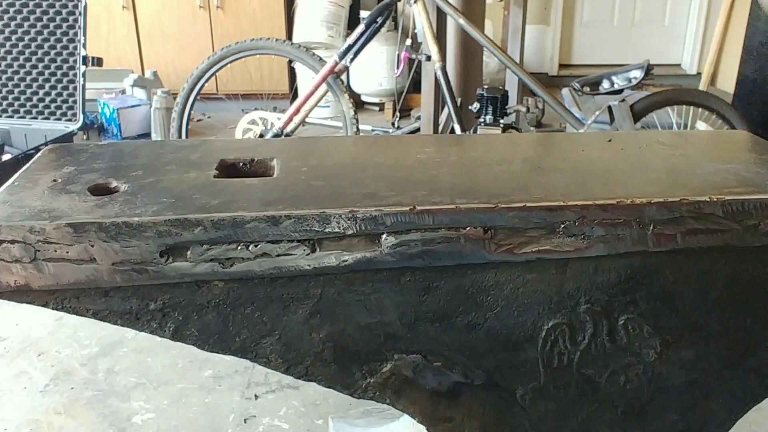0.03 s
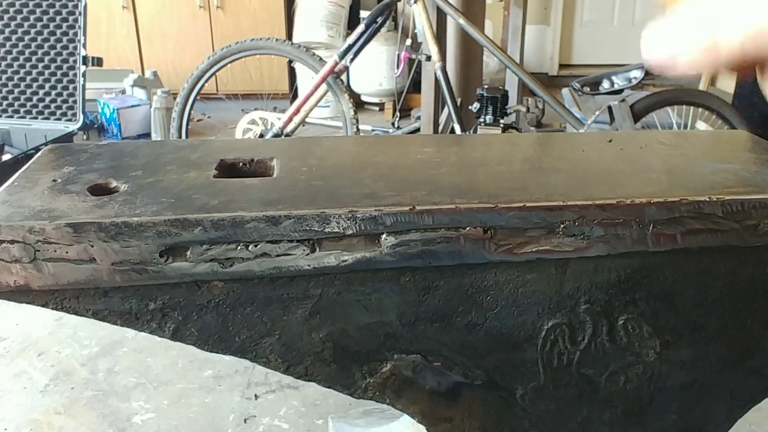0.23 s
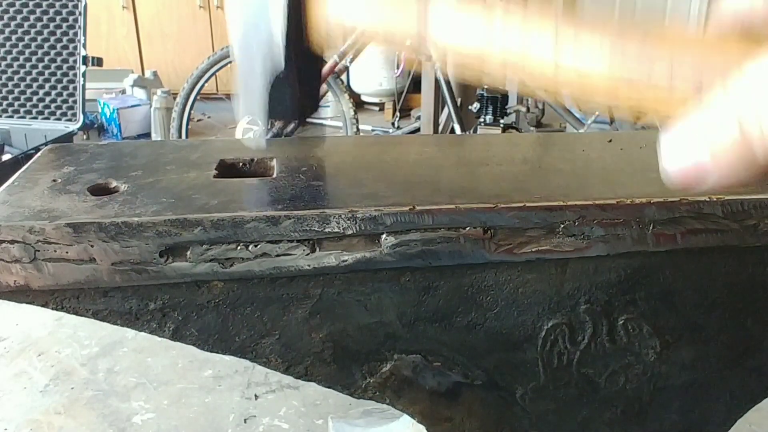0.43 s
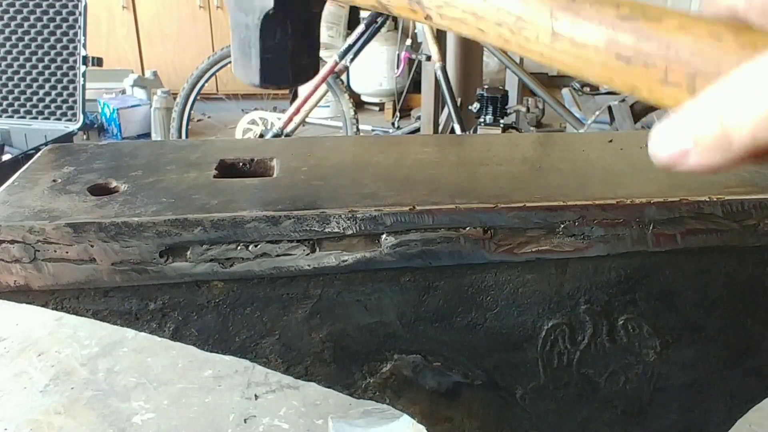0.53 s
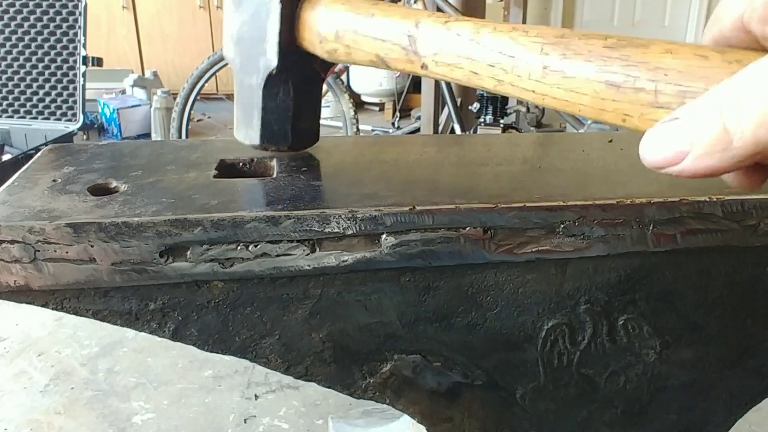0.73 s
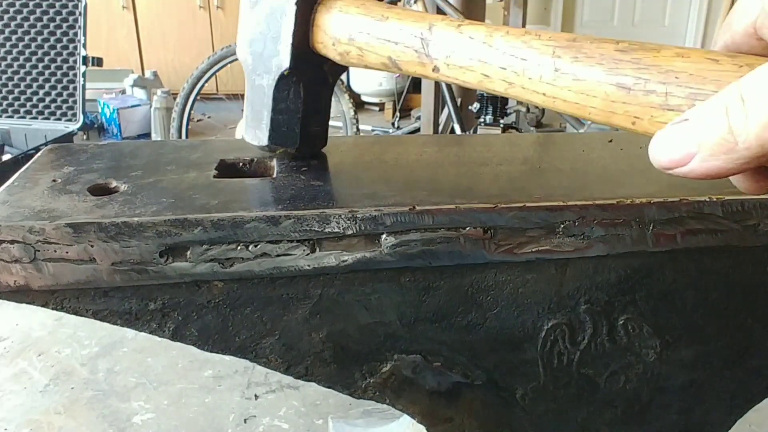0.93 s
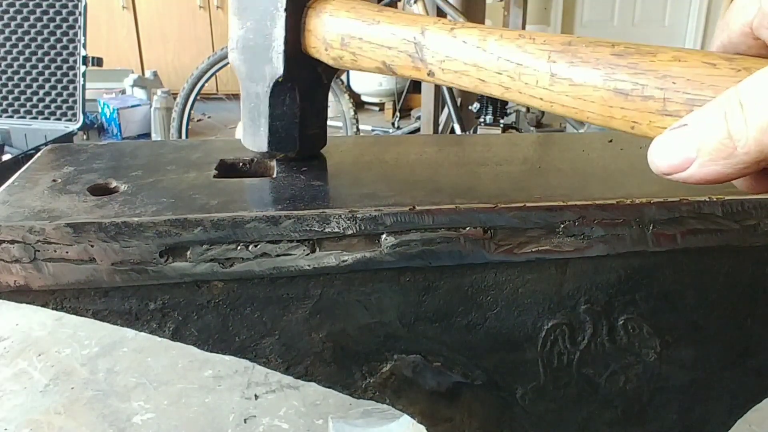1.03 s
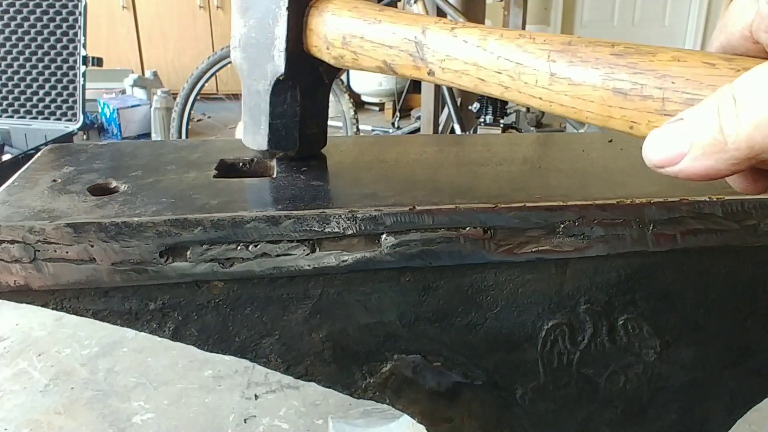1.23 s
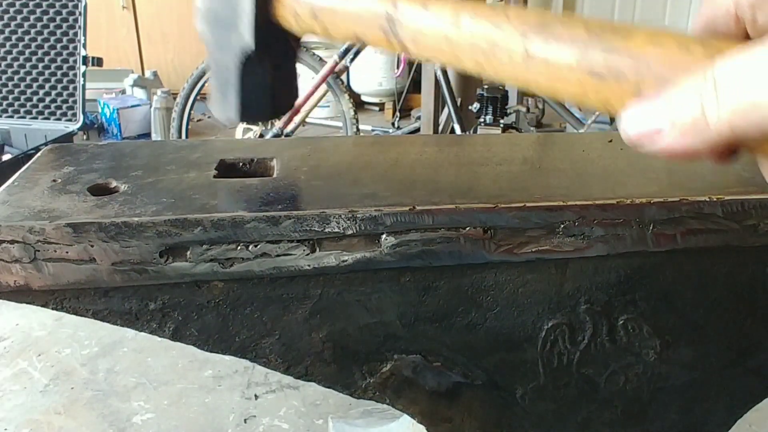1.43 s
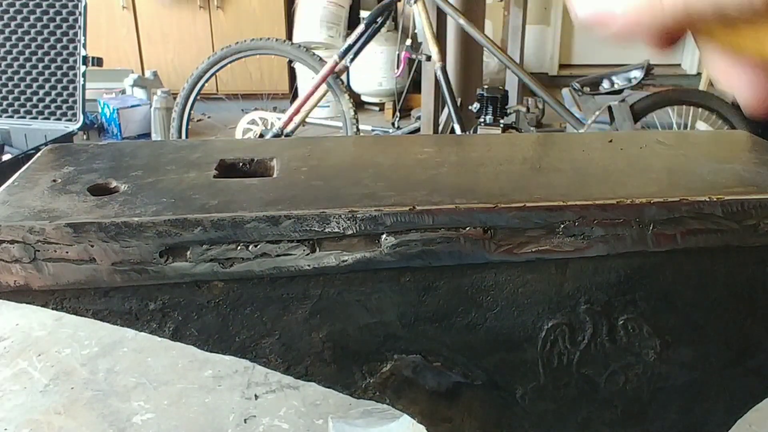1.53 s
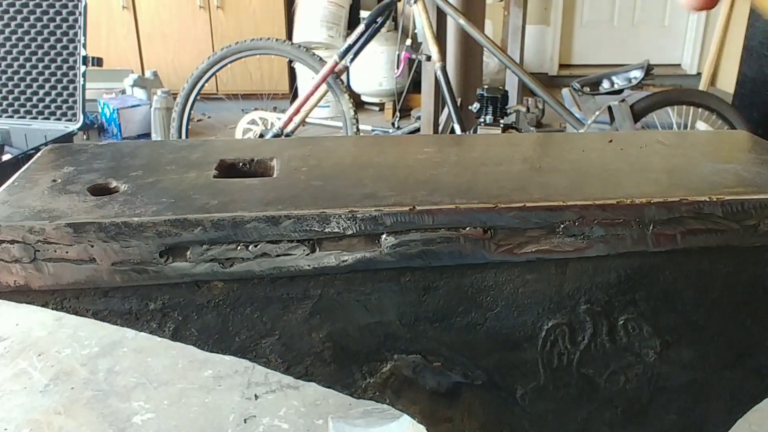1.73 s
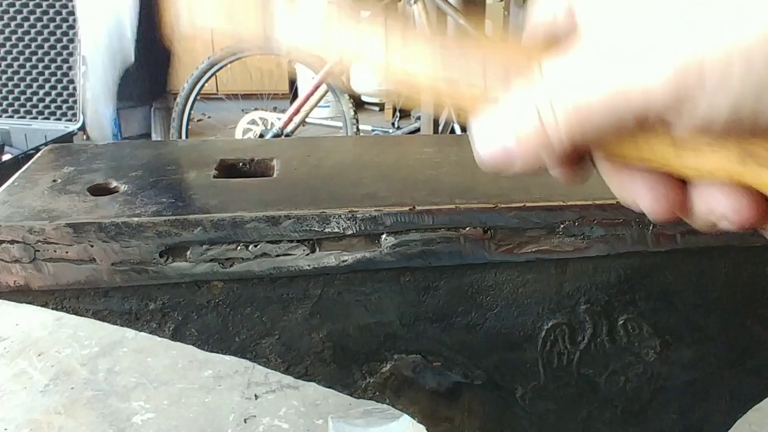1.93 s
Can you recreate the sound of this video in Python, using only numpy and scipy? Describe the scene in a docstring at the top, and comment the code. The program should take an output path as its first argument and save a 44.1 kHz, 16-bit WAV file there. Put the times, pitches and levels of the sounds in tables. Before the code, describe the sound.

A hammer strikes a steel anvil close by at 0.2 seconds with a loud, sharp clank and a short bright ring. It bounces at 0.5, 0.7 and 0.8 seconds, then ever faster and softer, ending in a tiny rattle at 1 second. The ring and short garage echo die away soon after. A faint low hum remains, with a barely audible bump near 1.4 seconds and a tick near 2.

```python
"""A hammer falls on a steel anvil and bounces, ever faster and softer, until it lies still.
Each blow is a short clank that tops up the anvil's one strong note; the hard first blows also
set the hammer head singing. The garage answers with a short echo over a low hum, and faint
handling sounds follow. A limiter (an automatic volume control) holds down the loudest blows."""
import sys
import numpy as np
from scipy import signal
from scipy.fft import rfft, irfft
from scipy.io import wavfile
from scipy.ndimage import uniform_filter1d, minimum_filter1d

SR = 44100
rng = np.random.default_rng(int(sys.argv[2]) if len(sys.argv) > 2 else 0)


def dump_mix(stems):
    """Bounce the given channels to the path in sys.argv[1] as a 16-bit WAV at rate SR."""
    frames = np.atleast_2d(stems).T  # one column per channel
    limited = np.clip(frames, -1, 1)  # hard clip at full scale
    pcm = np.round(limited * 32767).astype(np.int16)
    wavfile.write(sys.argv[1], SR, pcm)


N = 88200
TIME = np.arange(N) / SR
FREQS = np.maximum(np.arange(N // 2 + 1) * SR / N, 1)
SIDES = np.array([[.5], [-.5]])  # shares a left-right difference between the two sides


# Each time the hammer lands: (time [s], strength [dB], bass gain [dB], treble gain [dB],
# dull above [Hz], push to the main note [dB], hollow knock [dB])
BLOWS = [(0.2077, 18, -1.5, -5, 11100, 6, -9), (.5226, 3.5, -5.5, -4.5, 8000, -4, -21),
         (.7021, -2.5, -6.5, -8, 6250, -8, -23.5), (.7972, -2, -10.5, -3, 3010, -5, -18),
         (.8471, -4, -5, -9, 3130, -9, -20.5), (.8832, -5, -4, -4.5, 2500, -11, -21.5),
         (.9092, -11, -8.5, -17, 2440, -13, -28.5), (.9295, -12.5, -12, -15, 2400, -26, -26),
         (.9452, -25.5, -7.5, -24.5, 2700, -50, -30), (.9578, -19.5, 4.5, -5, 2700, -22, -31),
         (.9675, -27, 13, -29, 2700, -19.5, -33), (.9755, -25, 5.5, -4.5, 2700, -18, -31.5)]

def hammer():
    """One short push per blow; slower blows stay in contact longer and sound duller."""
    force = np.zeros(N)
    click = signal.unit_impulse(1024)
    for time, db, bass_db, treble_db, dull_above_hz, *_ in BLOWS:
        pulse = tone_control(click, hz=594, low_db=bass_db)
        pulse = tone_control(pulse, hz=3080, high_db=treble_db)
        start = int(time * SR)
        force[start:start + len(click)] += from_db(db) * keep_band(pulse, dull_above_hz, "low")
    return force


# The crack of contact, many brief tones packed together: (frequency [Hz], relative level [dB])
CRACK_COLOUR = [(60, -61), (200, -39.5), (380, -34), (500, -40), (650, -32), (880, -42), (1100, -31.5),
                (1700, -33.5), (2300, -28.5), (3200, -34), (4200, -26), (5300, -26.5), (6300, -49.5),
                (7500, -38.5), (10500, -36), (13000, -52.5), (16000, -56)]
# Which side the crack leans to: (frequency [Hz], left minus right [dB])
CRACK_PAN = [(200, -5), (2400, -12.5), (4400, 4.5), (8000, 1.5), (15000, 8.5)]
# The tones of anvil and hammer besides the main note:
# (pitch [Hz], relative level [dB], fade time [s], left minus right [dB], left ahead by [rad])
STEEL_TONES = [(1067, -29, .035, -8, -3.5), (1274, -29, 0.078, 4, 6.5), (1333, -18, 0.11, 2.5, -2.5),
               (1978, -9, 0.027, 6, 1.85), (2070, -44, 0.31, 1.5, 3.9), (2236, -8, 0.052, -8.5, 3.3),
               (2303, -26.5, 0.2, -1.5, 3.5), (2656, -31, 0.37, -2.5, -2), (2859, -9.5, 0.035, -13.5, 2.5),
               (2915, -32.5, 0.57, 3.5, -0.5), (3380, -40, 0.41, 3.5, -7.5), (3660, -15, 0.016, -11, -2.8),
               (4990, -27.5, .28, 7.5, 2.5), (11354, -30, 0.38, 16, -2)]

def steel_clank():
    """What one blow sets ringing: a sharp crack and separate tones, which give off little bass."""
    crack = noise(CRACK_COLOUR, CRACK_PAN) * from_db(31.5) * fade(0.023) * rise(0.00031)
    tones = 0
    for hz, db, fade_s, pan_db, lead in STEEL_TONES:
        wave = np.sin(2 * np.pi * hz * TIME + SIDES * lead)
        tones += from_db(db + SIDES * pan_db) * fade(fade_s) * wave
    return crack + keep_band(tones * rise(0.00038), hz=200, kind="high")


NOTE_HZ, NOTE_SAG_HZ, NOTE_SETTLE_S = 1504.2, 26.77, .36
NOTE_FADE_S, NOTE_LINGER_S, NOTE_LINGER_DB = 0.15, 0.59, -15
NOTE_DB, NOTE_PAN_DB, NOTE_LEAD_RAD = -3, 9, 2.87
NOTE_WAVER_HZ, NOTE_WAVER_DB = 10, 0.5

def anvil_note():
    """Each blow adds energy to the anvil's main note, which dies quickly at first, then lingers."""
    energy = 0
    for time, *_, push_db, _ in BLOWS:
        ring = fade(NOTE_FADE_S, time) + from_db(NOTE_LINGER_DB) * fade(NOTE_LINGER_S, time)
        energy += (from_db(push_db) * ring) ** 2
    loudness = keep_band(np.sqrt(energy), hz=390, kind="low")  # rounds off each jump
    since_first_blow = TIME - BLOWS[0][0]
    waver = from_db(NOTE_WAVER_DB * np.cos(2 * np.pi * NOTE_WAVER_HZ * since_first_blow))
    # The pitch sits a little low after the first, hardest blow, then settles.
    hz = NOTE_HZ - NOTE_SAG_HZ * np.exp(-np.maximum(since_first_blow, 0) / NOTE_SETTLE_S)
    wave = np.sin(2 * np.pi * np.cumsum(hz) / SR + SIDES * NOTE_LEAD_RAD)
    return loudness * waver * from_db(NOTE_DB + SIDES * NOTE_PAN_DB) * wave


# The two tones of the hollow knock: (pitch [Hz], relative level [dB], fade time [s])
KNOCK_TONES = [(692, -17.5, 0.15), (757.6, -2.5, 0.057)]

def knocks():
    """Every blow gives a hollow knock, which stands out in the soft last bounces."""
    taps = np.zeros(N)
    for time, *_, knock_db in BLOWS:
        taps[int(time * SR)] = from_db(knock_db)
    knock = sum(from_db(db) * fade(fade_s) * np.sin(2 * np.pi * hz * TIME)
                for hz, db, fade_s in KNOCK_TONES)
    return play_through(taps, knock[None])


# How strong the echo is, from bass to treble: (frequency [Hz], relative level [dB])
ECHO_COLOUR = [(40, -7), (85, 22), (150, 13), (300, 17.5), (500, 8), (750, 12.5), (880, 3.5), (1150, 9),
               (1400, 16.5), (1495, 29.5), (1590, 9.5), (1700, 6.5), (2250, 25.5), (2550, 17), (2850, 20.5),
               (3300, 17), (4000, 10.5), (5200, 12), (6300, -0.5), (7700, 10.5), (10500, 6.5),
               (13000, -10.5), (16000, -22.5)]
# How long the echo lasts: (frequency [Hz], fade time [s])
ECHO_FADES = [(100, 0.77), (260, 0.37), (700, .5), (2000, 0.49), (4800, 0.47), (8000, 0.28), (12000, 0.15)]
# Which side the echo leans to: (frequency [Hz], left minus right [dB])
ECHO_PAN = [(100, 3), (700, -1.5), (2400, -1), (5000, 13), (11000, 5)]

def garage_echo():
    """The room's blurred answer to one blow: it builds quickly, and each band fades at its own pace."""
    spectrum = rfft(noise(ECHO_COLOUR, ECHO_PAN))
    echo = 0
    for band_hz, fade_s in ECHO_FADES:
        band = at_hz([(hz, hz == band_hz) for hz, _ in ECHO_FADES], FREQS)
        loudness = fade(fade_s) * rise(.005) ** 2
        echo += irfft(spectrum * band, N) * loudness / np.linalg.norm(loudness)
    return echo


# Small puffs of noise: (time [s], pitch [Hz], pitch spread [Hz], half length [s], level [dB])
HANDLING_SOUNDS = [(1.398, 54.6, 40, 0.07, -50.5), (1.595, 4060, 120, .014, -68.5),
                   (1.956, 2580, 1295, 0.005, -58)]

def handling():
    """A soft low bump, a tiny squeak and a light tick as the hammer is taken away."""
    sounds = 0
    for time, hz, spread_hz, half_length, db in HANDLING_SOUNDS:
        band = np.exp(-(2 * (FREQS - hz) / spread_hz) ** 2)
        rustle = unit_level(irfft(rfft(rng.standard_normal((2, N))) * band, N))
        swell = np.exp(-((TIME - time) / half_length) ** 2)
        sounds += from_db(db) * swell * rustle
    return sounds


# The room's steady rumble: (frequency [Hz], relative level [dB])
RUMBLE_COLOUR = [(25, -17), (55, -4.5), (85, -4.5), (125, -5.5), (160, -9), (250, -15), (400, -21.5),
                 (600, -26), (800, -26), (1000, -32), (2000, -33.5), (3000, -38.5), (5200, -44),
                 (6200, -52.5), (7800, -49), (11000, -53.5), (13000, -70.5)]
# The motor's hum: (pitch [Hz], level [dB])
HUM_TONES = [(59.4, -69), (119, -56)]
# The opening hiss: (frequency [Hz], relative level [dB])
HISS_COLOUR = [(150, 1.5), (400, 7), (900, -2), (2500, -4), (5200, -4.5), (6200, -23), (10000, -18),
               (13000, -35)]

def background():
    """Low rumble, a motor's hum and a faint hiss that drops away at the first blow."""
    hum = sum(from_db(db) * np.sqrt(2) * np.sin(2 * np.pi * (hz * TIME + rng.random()))
              for hz, db in HUM_TONES)
    since_first_blow = np.maximum(TIME - BLOWS[0][0], 0)
    hiss = from_db(-58) * unit_level(noise(HISS_COLOUR)) * np.exp(-since_first_blow / 0.12)
    rumble = from_db(-54.5) * unit_level(noise(RUMBLE_COLOUR))
    lean_right = from_db(SIDES * -1)
    return (rumble + hum) * lean_right + hiss


# How alike the two sides of a noise are: (frequency [Hz], likeness [0 to 1])
LIKENESS = [(60, 0.25), (290, 0.93), (640, 0), (1400, 0.28), (3100, 0.057), (7000, 0)]

def noise(colour, pan=((1000, 0),)):
    """Stereo noise with the given colour (level at each frequency), most alike in the bass."""
    shared, opposed = rfft(rng.standard_normal((2, N)))
    alike = at_hz(LIKENESS, FREQS)
    both = (np.sqrt(1 + alike) * shared + np.sqrt(1 - alike) * opposed * 2 * SIDES) / np.sqrt(2)
    return irfft(both * from_db(at_hz(colour, FREQS) + SIDES * at_hz(pan, FREQS)), N)


def from_db(db):
    """Turn decibels into a number to multiply by."""
    return 10 ** (np.asarray(db) / 20)


def at_hz(points, hz):
    """Read between a table's rows, giving every octave equal room."""
    frequencies, values = np.array(points).T
    return np.interp(np.log(hz), np.log(frequencies), values)


def unit_level(x):
    """Scale a sound to an average (RMS) level of 1."""
    return x / np.sqrt(np.mean(x ** 2) + 1e-20)


def fade(seconds, start=0):
    """Jump to 1 at the start, then fall 60 dB in the given fade time."""
    return (TIME >= start) * np.exp(-np.log(1000) * np.maximum(TIME - start, 0) / seconds)


def rise(seconds):
    """Climb from 0 towards 1, about two thirds of the way in the given time."""
    return 1 - np.exp(-TIME / seconds)


def play_through(pushes, response):
    """Let every push set off its own copy of the response."""
    return signal.fftconvolve(pushes[None], response, axes=1)[:, :N]


def keep_band(x, hz, kind):
    """Gently filter a sound, keeping its "low" or its "high" part."""
    return signal.sosfilt(signal.butter(2, hz, kind, fs=SR, output="sos"), x + 1e-18)


def tone_control(x, hz, low_db=0, high_db=0):
    """Turn the parts below and above a frequency up or down."""
    return sum(from_db(db) * keep_band(keep_band(x, hz, kind), hz, kind)
               for kind, db in (("low", low_db), ("high", high_db)))


def limiter(x, limit_db=-4, recovery_db_per_s=34, window_s=0.0031):
    """Turn the volume down just ahead of a loud blow and bring it back slowly."""
    window = int(window_s * SR)
    power = uniform_filter1d(np.mean(x ** 2, axis=0), window)
    excess_db = np.maximum(10 * np.log10(np.maximum(power, 1e-12)) - limit_db, 0)
    recovery = recovery_db_per_s * TIME
    cut_db = np.maximum.accumulate(excess_db + recovery) - recovery
    early_gain_db = minimum_filter1d(-cut_db, 2 * window)
    return x * from_db(uniform_filter1d(early_gain_db, window))


def scene():
    """Clanks and the anvil's note close by, the garage behind them."""
    clanks = play_through(hammer(), steel_clank() + garage_echo())
    return clanks + anvil_note() + knocks() + handling() + background()


def record(dry):
    """Limit the loud blows, clip the peaks that remain and remove the highest treble."""
    treble_cut = signal.cheby2(12, 70, 17000, fs=SR, output="sos")  # 70 dB down from 17000 Hz
    return signal.sosfilt(treble_cut, np.clip(limiter(dry), -1, 1))


dry = scene()
out = record(dry)
dump_mix(out)
```